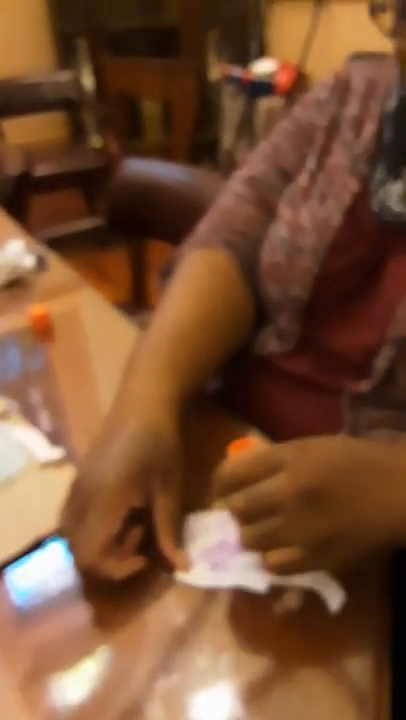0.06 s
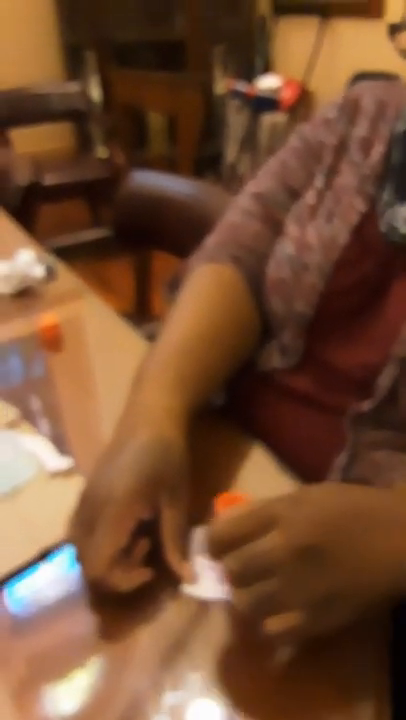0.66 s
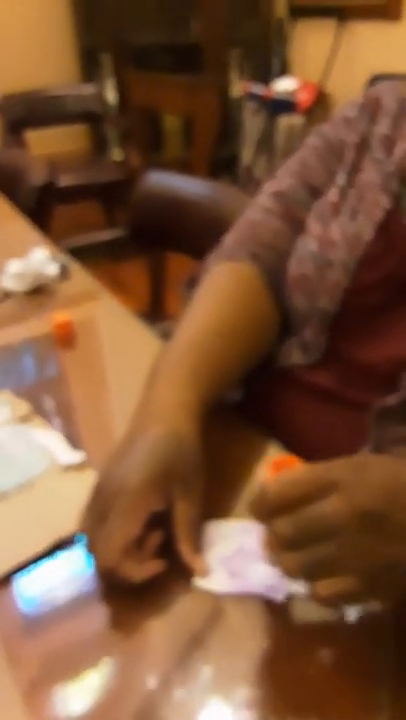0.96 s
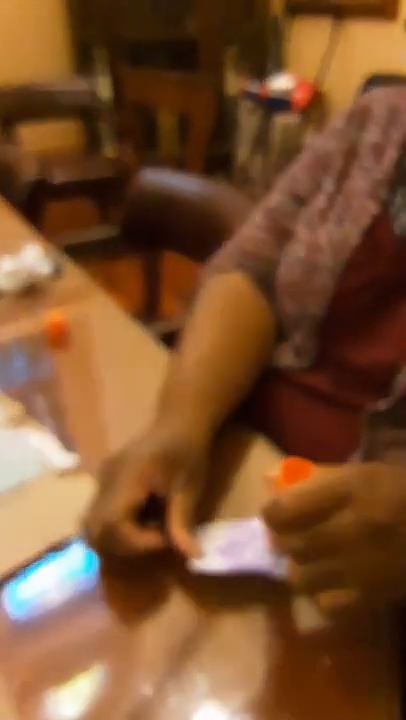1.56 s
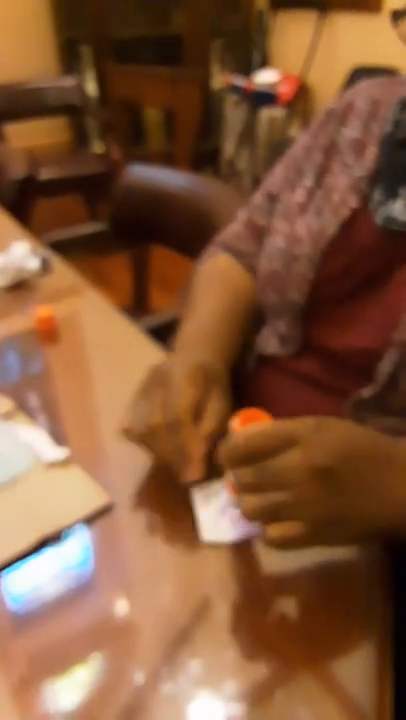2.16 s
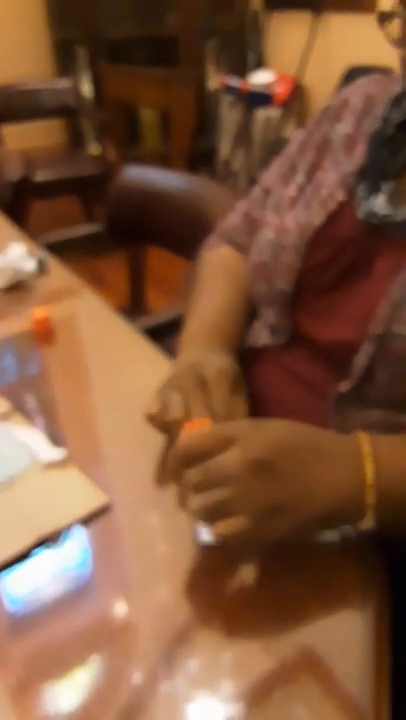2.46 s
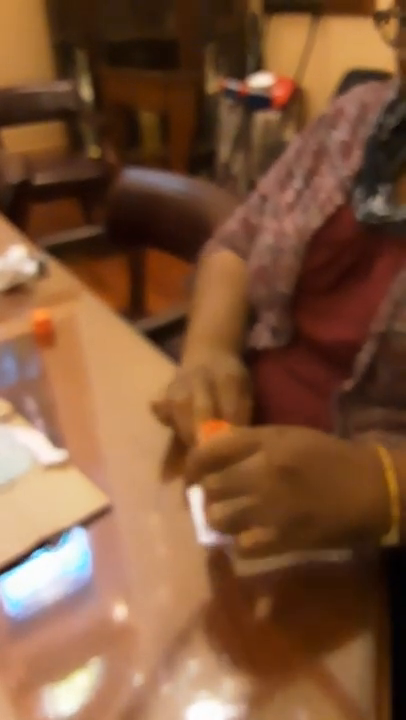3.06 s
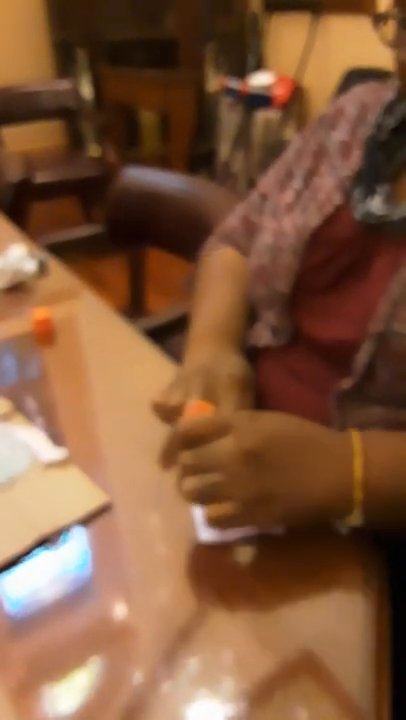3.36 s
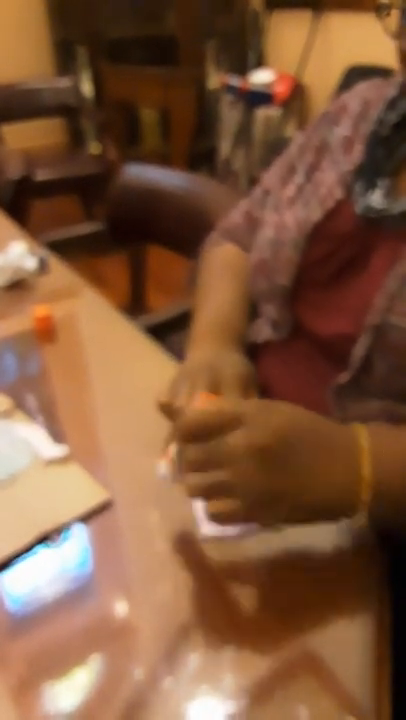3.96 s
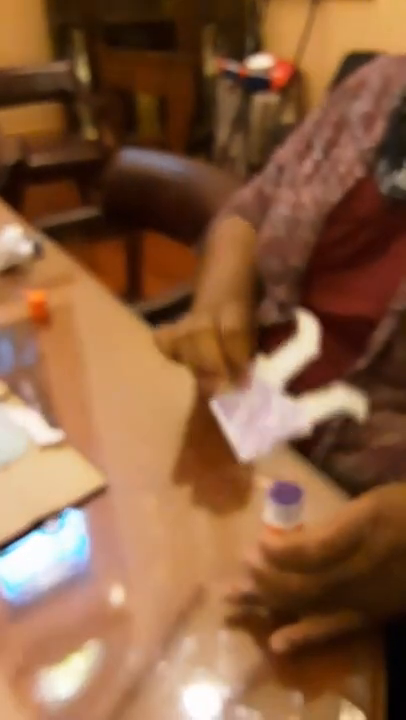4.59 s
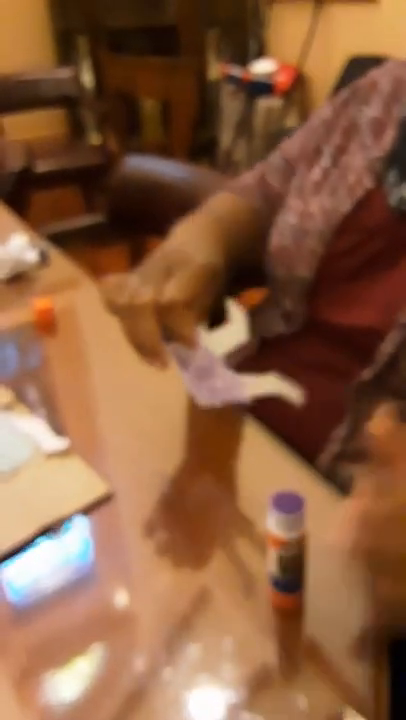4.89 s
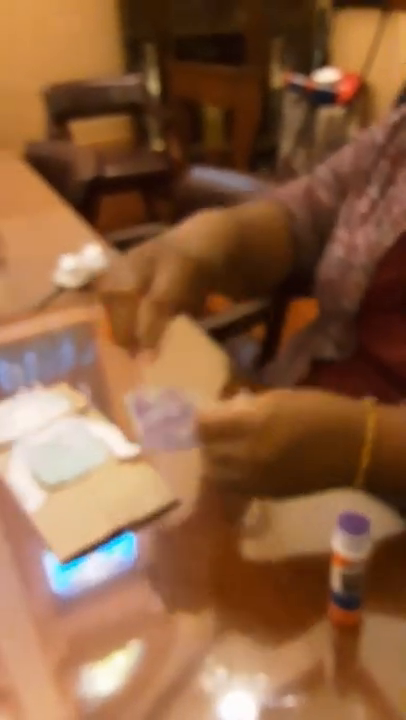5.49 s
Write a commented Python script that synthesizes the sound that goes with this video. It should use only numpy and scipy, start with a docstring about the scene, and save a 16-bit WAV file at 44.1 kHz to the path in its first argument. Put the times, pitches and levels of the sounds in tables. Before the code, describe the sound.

A glue stick rubs and dabs on paper, knocking a wooden table, then is set down with a plastic clack.

```python
"""A glue stick scrapes over a paper cutout and squeaks as it sticks and slips, amid soft bumps.
Five dabs follow: each knocks the wooden tabletop and the tacky glue ticks. Between them the paper
slides in short strokes, snapping and crackling. The plastic tube is stood on its end with a clack,
then a faint, breathy hiss swells and fades. The room rings for about a second; an appliance hums
over faint noise, and a low drone swells near the end."""
import sys
import numpy as np
from scipy import signal
from scipy.fft import rfft, irfft, next_fast_len
from scipy.io import wavfile
from scipy.ndimage import uniform_filter1d, map_coordinates

SR = 44100
rng = np.random.default_rng(int(sys.argv[2]) if len(sys.argv) > 2 else 0)


def transcribe(signal):
    """Save signal, clipped to [-1, 1], as a 16-bit WAV file at the path in sys.argv[1]."""
    frames = np.atleast_2d(signal).T
    limited = np.clip(frames, -1, 1)
    pcm = np.round(limited * 32767).astype(np.int16)
    wavfile.write(sys.argv[1], SR, pcm)


N = 243873
TIME_S = np.arange(N) / SR
HIT_SAMPLES = SR // 4


def amp(db):
    """Decibels to gain."""
    return 10 ** (np.asarray(db) / 20)


def unit_rms(x):
    """Scale to rms 1."""
    return x / np.sqrt(np.mean(x ** 2) + 1e-20)


def at_hz(points, hz):
    """Read (frequency, value) points on a log axis."""
    knots_hz, values = np.transpose(points)
    return np.interp(np.log(hz + 1), np.log(knots_hz + 1), values)


def curves(rows):
    """One value per sample for each column after the time."""
    knots_s, *columns = np.transpose(rows)
    return [np.interp(TIME_S, knots_s, column) for column in columns]


def gate(rows):
    """Soft gate from the first row's time to the last."""
    inside = (TIME_S >= rows[0][0]) & (TIME_S <= rows[-1][0])
    return uniform_filter1d(1. * inside, size=400)


def wobble(knots_per_s):
    """Smooth random curve."""
    return map_coordinates(rng.standard_normal(400), [TIME_S * knots_per_s], mode="mirror")


def filtered(x, response):
    """Apply a frequency response."""
    n = x.shape[-1]
    padded = next_fast_len(n + 8192)
    hz = np.fft.rfftfreq(padded, 1 / SR)
    return irfft(rfft(x, padded) * response(hz), padded)[..., :n]


def equalised(x, spectrum):
    """Apply (frequency [Hz], gain [dB]) points."""
    return filtered(x, lambda hz: amp(at_hz(spectrum, hz)))


def coloured(x, spectrum):
    """Equalise, then scale to rms 1."""
    return unit_rms(equalised(x, spectrum))


def soften(x, corner_hz):
    """A soft contact passes little above its corner."""
    return filtered(x, lambda hz: 1 / (1 + np.sqrt(2) * 1j * hz / corner_hz - (hz / corner_hz) ** 2))


def add(track, time_s, sound):
    """Mix a sound in at time_s."""
    part = track[max(round(time_s * SR), 0):][:len(sound)]
    part += sound[:len(part)]


def decay(t60_s):
    """A quarter second of exponential decay."""
    return 1000. ** (-TIME_S[:HIT_SAMPLES] / t60_s)


def ring(modes):
    """Sum of struck modes: (frequency [Hz], t60 [s], level [dB])."""
    t = TIME_S[:HIT_SAMPLES]
    return sum(amp(db) * decay(t60_s) * np.cos(2 * np.pi * hz * t) for hz, t60_s, db in modes)


def click(db):
    """The sharp first instant of a contact."""
    return amp(db) * signal.unit_impulse(HIT_SAMPLES, SR // 2000)


def tick(db, centre_hz, t60_s):
    """A click and the short crackle after it, in one broad band."""
    band = lambda hz: 1 / (1 + (hz / centre_hz - centre_hz / (hz + 1)) ** 2 / 2)
    envelope = decay(t60_s) * (1 - decay(t60_s=0.0084))
    crackle = amp(-5) * envelope * rng.standard_normal(HIT_SAMPLES)
    return amp(db) * filtered(click(db=4.5) + crackle, band)


def friction(grain_db):
    """Noise clumped into grains of uneven size, as from countless tiny slips."""
    sizes = unit_rms(uniform_filter1d(rng.standard_normal(N), size=40))
    return unit_rms(rng.standard_normal(N) * amp(grain_db * sizes))


def swell(start_s, rise_s, fall_s, peakiness=2.47):
    """Smooth rise from 0 to 1 and back."""
    progress = np.interp(TIME_S, np.cumsum([start_s, rise_s, fall_s]), [0, 1, 0])
    return np.sin(np.pi / 2 * progress) ** peakiness


# Diffuse stereo width: (frequency [Hz], side over mid [dB])
DIFFUSE_WIDTH = [(100, -68), (250, -56), (550, -51), (1000, -25.5), (2000, -19), (4000, -13), (8000, -8.5),
                 (13000, -3.5)]


def spread(pair):
    """Two unrelated signals become a left and right that differ mainly in the treble."""
    mid, side = pair[0], equalised(pair[1], DIFFUSE_WIDTH)
    return np.array([mid + side, mid - side])


# Room reverberation: (frequency [Hz], t60 [s], level [dB])
ROOM_BANDS = [(101, 1.1, 4), (288, 0.89, 11), (703, 0.94, 0), (1810, 1.05, 9), (4850, 0.83, 0),
              (8900, 0.65, -5.5), (16100, 0.15, 9.5)]


def in_room(x, wet_db, gap_s=0.0018, build_s=0.044):
    """Direct sound plus the room's diffuse tail, which builds up after a short gap."""
    bands = np.array(ROOM_BANDS)
    hz, frame_s, noise = signal.stft(rng.standard_normal((2, SR + SR // 4)), SR, nperseg=256)
    t60_s = at_hz(bands[:, [0, 1]], hz)[:, None]
    gain = amp(at_hz(bands[:, [0, 2]], hz))[:, None]
    _, tail = signal.istft(noise * 1000. ** (-frame_s / t60_s) * gain, SR, nperseg=256)
    onset = np.clip((TIME_S[:tail.shape[1]] - gap_s) / build_s, 0, 1)
    tail = spread(tail * onset)
    wet = signal.fftconvolve(x[None], tail / np.linalg.norm(tail[0]), axes=1)[:, :N]
    return x + amp(wet_db) * wet


# Room noise spectrum: (frequency [Hz], gain [dB])
AIR_SPECTRUM = [(20, -19), (50, -14), (90, 1), (180, -0.5), (300, -1.5), (650, -1.5), (850, -9.5),
                (1400, -15), (2200, -33), (4500, -35), (7500, -33.5), (9300, -41.5), (11500, -31.5),
                (15500, -32.5)]
# Hiss spectrum: (frequency [Hz], gain [dB])
HISS_SPECTRUM = [(1500, -29), (2400, -2), (2900, -7), (3300, -10), (3800, -3), (4600, -15), (5600, 1.5),
                 (6300, -7.5), (6750, 8), (7150, -11), (7900, -3), (9300, -16), (9850, -4), (15500, -42)]
# Hiss envelope: (time [s], level [dB])
HISS_ENVELOPE = [(0, -79.5), (2.25, -80), (2.45, -118), (3, -74.5), (3.3, -80.5), (5.53, -77.5)]


def room_noise():
    """Steady low noise and a thin hiss that drops out briefly."""
    hiss_db, = curves(HISS_ENVELOPE)
    air = amp(-61.5) * coloured(spread(rng.standard_normal((2, N))), AIR_SPECTRUM)
    hiss = amp(hiss_db) * coloured(spread(rng.standard_normal((2, N))), HISS_SPECTRUM)
    return air + hiss


def wavering_tone(hz, waver_db=1.5, waver_rad=0.14):
    """A sine near rms 1 that drifts in level and phase."""
    gain = np.sqrt(2) * amp(waver_db * wobble(knots_per_s=3.48))
    return gain * np.sin(2 * np.pi * hz * TIME_S + waver_rad * wobble(knots_per_s=5))


# Appliance hum lines: (frequency [Hz], rms level [dB])
HUM_LINES = [(58.4, -80.5), (116.8, -72), (175.2, -63), (350.5, -71.5), (410, -77), (467.2, -76),
             (524, -88), (584, -64)]


def appliance_hum():
    """An appliance hums in lines that waver independently."""
    return sum(amp(db) * wavering_tone(hz) for hz, db in HUM_LINES)


# Drone envelope: (time [s], level [dB])
DRONE_ENVELOPE = [(0, -96), (4.4, -74.5), (4.9, -67), (5.53, -57.5)]


def drone():
    """A low tone swells near the end."""
    level_db, = curves(DRONE_ENVELOPE)
    return amp(level_db) * wavering_tone(hz=86.9)


# Soft hiss timing: (start [s], rise [s], fall [s])
SOFT_HISS_SWELL = (4.65, .26, .6)
# Soft hiss spectrum: (frequency [Hz], gain [dB])
SOFT_HISS_SPECTRUM = [(1000, -12), (2600, -8.5), (3700, -9.5), (4600, 3.5), (5600, -5), (8000, -10),
                      (10000, -18), (15500, -25)]


def soft_hiss():
    """A faint, breathy hiss near 4.6 kHz swells and fades."""
    hiss = coloured(friction(grain_db=3.5), SOFT_HISS_SPECTRUM)
    return in_room(amp(-72) * swell(*SOFT_HISS_SWELL) * hiss, wet_db=-4.5)


# Strokes of the cutout: (start [s], rise [s], fall [s], level [dB], treble share [dB])
SLIDE_STROKES = [(1.399, .23, 0.27, -72.5, 3.5), (1.724, 0.015, 0.13, -66.5, -6.5),
                 (1.91, .23, 0.23, -66.5, -3), (2.13, 0.16, 0.29, -69.5, -10),
                 (4.17, 0.097, 0.21, -72.5, -5), (4.24, 0.17, .2, -69, -34), (5.34, .07, .09, -75, -3.5)]
# Paper-on-wood spectrum: (frequency [Hz], gain [dB])
SLIDE_SPECTRUM = [(820, -32), (1400, -6), (1530, 5), (1750, 3.5), (1870, 10.5), (2180, -4), (2860, -1),
                  (3710, -1.5), (5900, -15), (8140, -21.5), (9190, -29.5), (11100, -25.5), (15500, -44)]


def paper_slides(crossover_hz=8100, treble_exponent=0.21):
    """The cutout slides on the wood: the faster, the louder and brighter."""
    out = np.zeros(N)
    grains = coloured(friction(grain_db=1.5), SLIDE_SPECTRUM)
    for start_s, rise_s, fall_s, db, treble_db in SLIDE_STROKES:
        grains = np.roll(grains, SR // 2)  # each stroke crosses fresh wood
        body = filtered(grains, lambda hz: 1 / (1 + (hz / crossover_hz) ** 4))
        treble = grains - body
        speed = swell(start_s, rise_s, fall_s)
        share = np.clip(amp(treble_db) * speed ** treble_exponent, 0, .95)
        out += amp(db) * speed * (np.sqrt(1 - share ** 2) * unit_rms(body) + share * unit_rms(treble))
    return in_room(out, wet_db=-18.5)


def paper_crackles(rate_per_s=8, level_db=-63.5, scatter_db=4):
    """The cutout flexes and crackles faintly at random during the slides and the soft hiss."""
    out = np.zeros(N)
    for start_s, rise_s, fall_s, *_ in SLIDE_STROKES + [SOFT_HISS_SWELL]:
        length_s = rise_s + fall_s
        for when, size in rng.random((round(rate_per_s * length_s), 2)):
            db = level_db + scatter_db * (2 * size - 1)
            add(out, start_s + when * length_s, tick(db, centre_hz=5500, t60_s=0.03))
    return out


# Paper and glue snaps: (time [s], level [dB], centre [Hz], t60 [s])
SNAP_EVENTS = [(0.945, -51, 8900, .017), (1.683, -43, 6850, .012), (1.738, -42, 5400, 0.04),
               (1.748, -47, 8100, 0.039), (2.289, -47, 7000, .016), (2.311, -44, 7500, .0095),
               (3.024, -32.5, 10200, 0.018), (3.28, -44.5, 8040, 0.017), (4.962, -40.5, 6900, 0.014),
               (5.407, -48, 7200, 0.038)]


def snaps():
    """Paper and threads of glue snap with a bright tick."""
    out = np.zeros(N)
    for time_s, db, centre_hz, t60_s in SNAP_EVENTS:
        add(out, time_s, tick(db, centre_hz, t60_s))
    return in_room(out, wet_db=1)


# Stick and hand bumps: (time [s], thud level [dB], pitch [Hz], tick centre [Hz], tick level [dB])
BUMP_EVENTS = [(0.046, -45.5, 130, 4000, -56), (.146, -40, 139, 4500, -52), (.220, -38, 174, 3400, -42.5),
               (.265, -37, 128, 3400, -44), (0.297, -40.5, 95, 4000, -47), (0.355, -43, 155, 6260, -43),
               (0.84, -40, 156, 7350, -41.5), (2.329, -39.5, 234, 6000, -46), (2.343, -37, 247, 6000, -57),
               (5.112, -46, 203, 2000, -52)]


def bumps():
    """Soft contacts give a low, damped push and stir the tabletop; the paper under them ticks."""
    thuds, ticks = np.zeros((2, N))
    for time_s, thud_db, pitch_hz, tick_hz, tick_db in BUMP_EVENTS:
        thud = ring([(pitch_hz, .04, 0), (330, .03, -9), (680, .03, -2)])
        add(thuds, time_s, amp(thud_db) * soften(thud, corner_hz=510))
        add(ticks, time_s, tick(tick_db, tick_hz, t60_s=.016))
    return in_room(thuds, wet_db=-14.5) + in_room(ticks, wet_db=1)


# Hollow tube response: (frequency [Hz], gain [dB])
TUBE_RESPONSE = [(200, -14), (900, -4), (1400, -16), (1850, -9.5), (2100, -20), (2500, -5), (2900, -3.5),
                 (3300, -10), (3900, -2), (4450, 2.5), (4900, -17), (6000, -20), (7600, -21), (10000, -36)]


def tube_set_down(time_s=4.4652):
    """The plastic tube clacks and briefly rattles as its base lands flat; the tabletop thuds faintly."""
    contact, thud = np.zeros((2, N))
    rattle = amp(-9) * decay(t60_s=0.061) * rng.standard_normal(HIT_SAMPLES)
    add(contact, time_s, amp(-31.5) * (click(db=17.5) + rattle))
    clack = equalised(contact, TUBE_RESPONSE)
    tabletop = ring([(175.3, 0.15, -49), (332, 0.027, -60)])
    add(thud, time_s, soften(tabletop, corner_hz=500))
    return in_room(clack + thud, wet_db=-4.5)


# Opening rub envelope: (time [s], level [dB])
RUB_ENVELOPE = [(0.0, -48.5), (0.05, -46.5), (0.084, -56.5), (0.156, -42.5), (0.19, -65), (0.2, -85)]
# Glue-on-paper spectrum: (frequency [Hz], gain [dB])
RUB_SPECTRUM = [(59, -57), (100, -21), (181, 5.5), (411, -18), (447, -6.5), (697, 0.5), (843, -17.5),
                (917, -14.5), (1760, -20.5), (2040, -15.5), (3120, -32.5), (3850, -16), (5070, -31.5),
                (6950, -19), (15500, -37)]
# Squeak of sticking glue: (time [s], pitch [Hz], level [dB])
SQUEAK_CONTOUR = [(.1, 640, -47.5), (.138, 680, -61), (.149, 699, -43.5), (.16, 772, -49), (.178, 723, -49),
                  (.19, 750, -78)]


def glue_rub(pitch_jitter=0.024):
    """The stick drags over the paper, and its stick-slip briefly locks into a rising squeak."""
    scrape_db, = curves(RUB_ENVELOPE)
    scrape = amp(scrape_db) * gate(RUB_ENVELOPE) * coloured(friction(grain_db=0.5), RUB_SPECTRUM)
    pitch_hz, squeak_db = curves(SQUEAK_CONTOUR)
    pitch_hz *= 1 + pitch_jitter * wobble(knots_per_s=240)
    phase = 2 * np.pi * np.cumsum(pitch_hz) / SR
    squeak = amp(squeak_db) * gate(SQUEAK_CONTOUR) * np.sin(phase)
    return in_room(scrape + squeak, wet_db=-15)


# Low tabletop modes: (frequency [Hz], t60 [s], struck near [dB], struck far [dB], polarity [+/-1])
TABLETOP_MODES = [(93, 0.18, -23, -38.5, 1), (205.4, 0.11, -10.5, -44, 1), (240, 0.068, -12.5, -17, 1),
                  (320.2, 0.048, -6, -15.5, 1), (553.3, 0.049, 10, -14, 1), (686, 0.0073, 9, 12, 1),
                  (638.2, 0.11, -1.5, -6.5, 1), (738.6, 0.049, 6.5, 4.5, -1), (966, 0.011, 7.5, 4, -1),
                  (1094, 0.056, -4, -23, -1), (1234, 0.045, -4.5, -12.5, 1)]
# Dense upper tabletop modes: (frequency [Hz], gain [dB])
UPPER_MODE_SPECTRUM = [(300, -22), (700, 10), (880, 1.5), (1100, -8), (1400, -1), (2200, -6), (3500, 0.5),
                       (5000, -5), (12000, -6.5)]


def tabletop_knock(corner_hz, place, upper_db):
    """The place struck sets each low mode's share; the soft glue rounds the blow."""
    low = sum(np.sign(polarity) * ring([(hz, t60_s, near_db + place * (far_db - near_db))])
              for hz, t60_s, near_db, far_db, polarity in TABLETOP_MODES)
    low = filtered(low, lambda hz: 1 / (1 + 1j * hz / corner_hz))
    dense_modes = coloured(rng.standard_normal(HIT_SAMPLES), UPPER_MODE_SPECTRUM)
    upper = amp(upper_db) * decay(t60_s=0.16) * dense_modes
    return soften(low + upper, corner_hz)


# Dabs of the stick: (time [s], knock level [dB], contact corner [Hz], place [0 near - 1 far],
# upper modes [dB], tick level [dB])
DAB_EVENTS = [(0.5003, -30.5, 605, 0.092, -4, -49.5), (1.0918, -29.5, 477, 0.058, -3, -41),
              (2.828, -22, 724, 0.36, -2.5, -40.5), (3.2713, -26, 464, 0.65, -6.5, -47.5),
              (3.6707, -22, 562, 1, -8.5, -49)]


def glue_dabs(bass_cut_hz=35):
    """Each dab knocks the tabletop, which radiates little deep bass; the tacky glue ticks on the paper."""
    knocks, ticks = np.zeros((2, N)), np.zeros(N)
    for time_s, knock_db, corner_hz, place, upper_db, tick_db in DAB_EVENTS:
        knock = np.zeros(N)
        add(knock, time_s, -amp(knock_db) * tabletop_knock(corner_hz, place, upper_db))
        knocks += in_room(knock, wet_db=-6.5)
        add(ticks, time_s, tick(tick_db, centre_hz=6760, t60_s=0.015))
    radiated = filtered(knocks, lambda hz: (1j * hz / (1j * hz + bass_cut_hz)) ** 2)
    return radiated + in_room(ticks, wet_db=1)


def scene():
    """Paper and glue stick sound from straight ahead, over the background."""
    background = room_noise() + appliance_hum() + drone() + soft_hiss()
    paper = paper_slides() + paper_crackles() + snaps()
    glue_stick = bumps() + tube_set_down() + glue_rub() + glue_dabs()
    return background + paper + glue_stick


def record(dry, band_limit_hz=15700):
    """Brick-wall low-pass."""
    return filtered(dry, lambda hz: hz < band_limit_hz)


dry = scene()
out = record(dry)
transcribe(out)
```